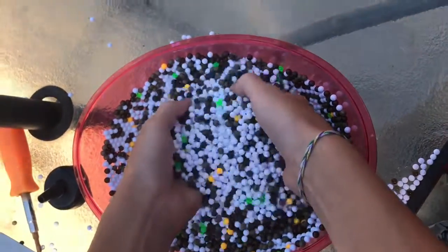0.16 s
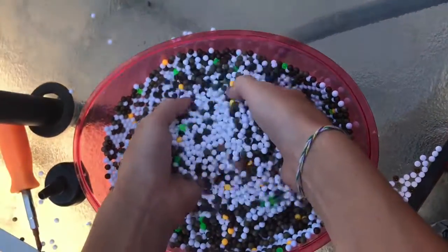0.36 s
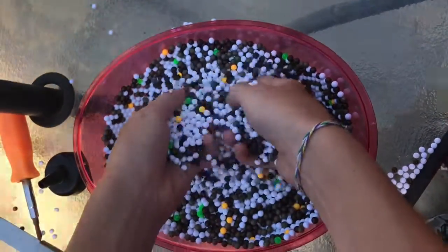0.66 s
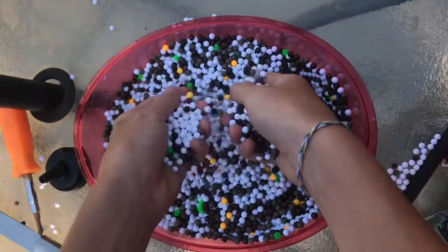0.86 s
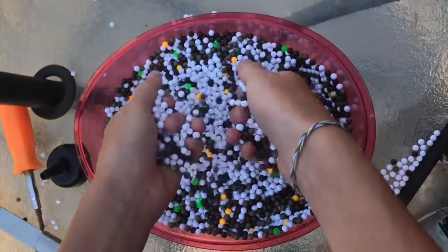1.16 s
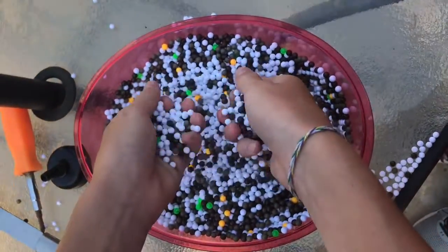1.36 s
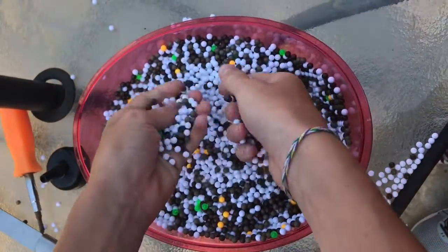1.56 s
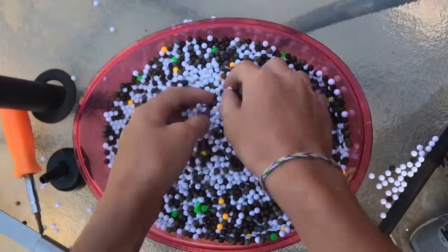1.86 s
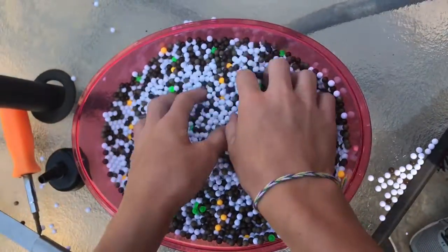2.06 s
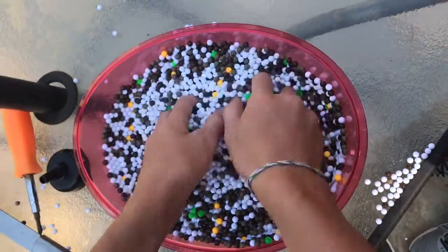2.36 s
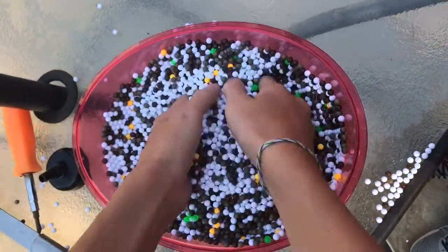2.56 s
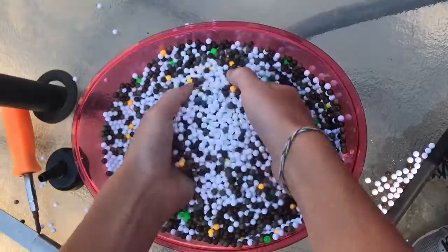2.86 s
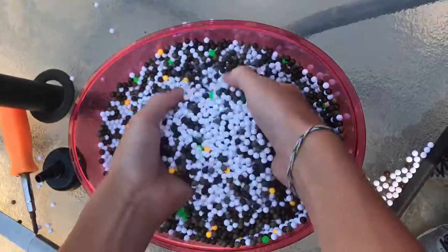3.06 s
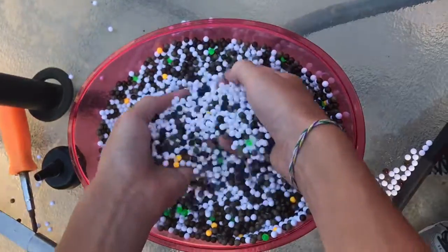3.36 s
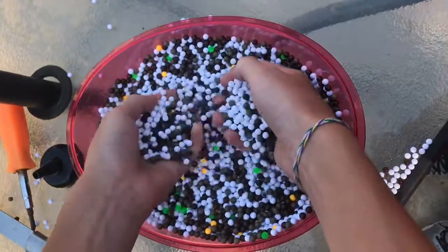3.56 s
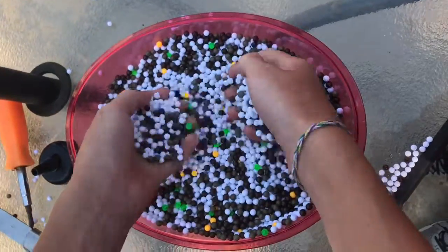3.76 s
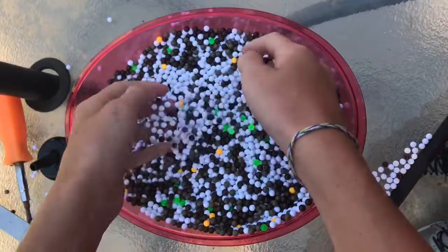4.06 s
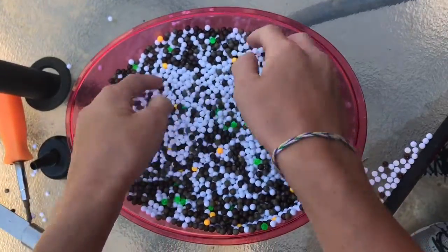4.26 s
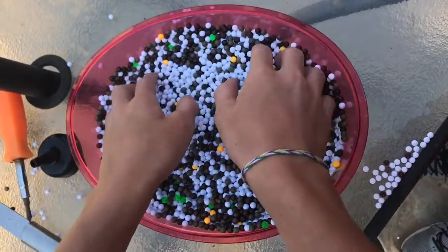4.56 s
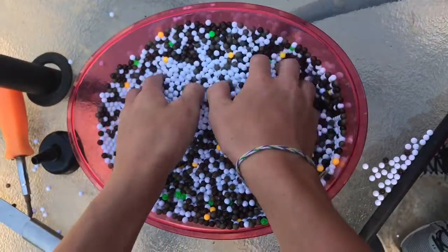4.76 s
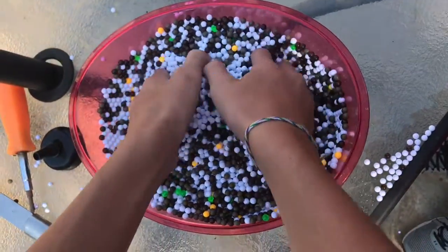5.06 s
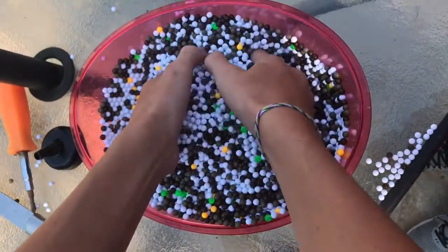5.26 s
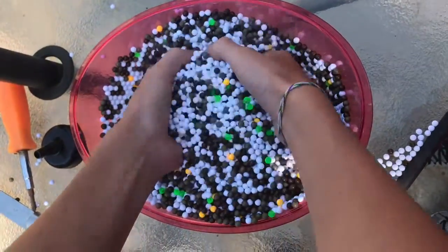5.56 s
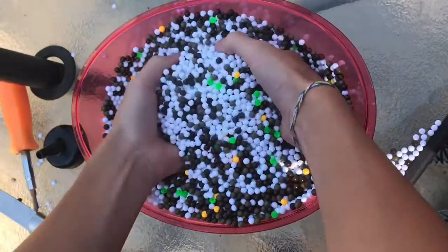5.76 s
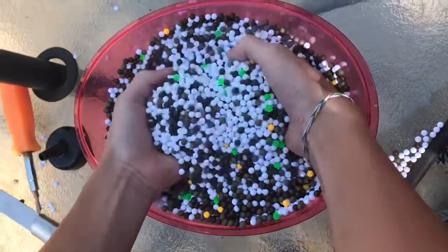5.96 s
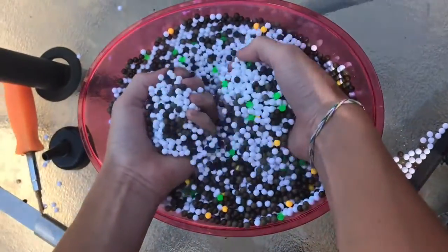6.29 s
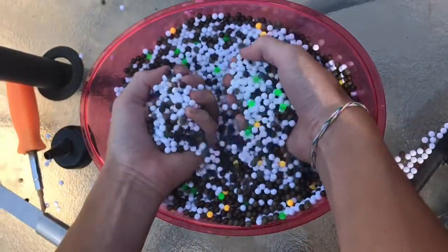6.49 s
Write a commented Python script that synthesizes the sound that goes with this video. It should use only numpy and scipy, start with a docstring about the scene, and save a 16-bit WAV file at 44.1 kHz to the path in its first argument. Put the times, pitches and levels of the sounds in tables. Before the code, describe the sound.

Thousands of light plastic beads rattle and hiss as they are pushed, scooped and let run back in a plastic bowl with a faint hollow tone. The rush opens strong, thins to a few ticking drops, surges again, breaks into hard clacks around the middle, and finishes with its biggest sweep. Wind thumps the close microphone in irregular gusts; the outdoors is otherwise quiet, without echo.

```python
"""Plastic beads scooped in a bowl

Two hands scoop small plastic beads in a wide plastic bowl outdoors and let them run back.
Pushed beads rush as thousands of random noise-burst knocks; falling beads clack, each with its own ring.
Gusts thump the microphone as bands of lumpy noise; a faint outdoor rumble is steady filtered noise."""
import sys
import numpy as np
from scipy import signal
from scipy.fft import rfft, irfft
from scipy.io import wavfile
from scipy.ndimage import uniform_filter1d

SR = 44100
rng = np.random.default_rng(int(sys.argv[2]) if len(sys.argv) > 2 else 0)


def int16_out(signal):
    """Quantize to a 16-bit WAV file."""
    q = np.round(np.clip(np.atleast_2d(signal).T, -1, 1) * 32767)
    wavfile.write(sys.argv[1], SR, q.astype(np.int16))


N = 292383

# pushes through the heap: [t of peak/s, relative level/dB, swell/s per 10 dB, fade/s per 10 dB]
STROKES = [(0.09, -25, 0.18, 0.13), (0.25, -22, 0.34, 0.4246), (2.01, -20.5, 0.1147, 0.26),
           (2.25, -24, .05, .15), (2.34, -25.5, .08, .3), (2.69, -29, 0.17, 0.03),
           (3.14, -24.5, 0.49, 0.61), (4.04, -26.5, 0.03, 0.04), (4.15, -29, 0.02, 0.21),
           (4.32, -27, .17, 0.3), (4.72, -21, 0.12, 0.13), (4.82, -24.5, 0.02, 0.17),
           (5.09, -27, 0.16, 0.26), (5.335, -26.5, .08, .07), (5.6, -23, .38, .12), (5.76, -25, 0.1, 0.05),
           (5.94, -24, 0.02, 0.08), (6.06, -18, 0.25, 0.24), (6.6, -25, 0.58, .5)]
# hands stop to turn, heap settles: [t/s, level change/dB, half length to 1/e/s]
RESTS = [(1.89, -4, 0.021), (2.17, -5.5, .035), (3.829, -4, 0.021), (4.415, -3.5, .03), (4.49, -6.5, 0.034)]
# fingers under the heap: [t/s, depth/0-1]
FINGER_DEPTH = [(0, .7), (.3, 0.18), (1.95, 0), (2.5, 0.35), (2.9, 1.0), (3.25, 0.06), (4.15, 0.2),
                (4.9, 0.49), (5.8, 0.96), (6.15, 0.26), (6.63, 0.17)]
# ring of the hollow between hands and heap: [t/s, f/Hz, relative level/dB]
HAND_HOLLOW = [(0, 2710, 4), (.25, 2730, 10), (1.2, 2700, -36), (2.05, 3204, -5), (2.9, 2490, -5),
               (5.4, 3420, -7), (6.63, 3027, 6)]
# hollow tone of the bowl: [t/s, relative level/dB]
BOWL_LEVEL = [(0.0, -40), (1.77, -44.5), (2.03, -38.5), (2.16, -49), (2.27, -38.5), (2.71, -41.5),
              (2.79, -45.5), (2.88, -42), (4.3, -41.5), (4.49, -52), (4.82, -40), (4.91, -46.5),
              (5.11, -40), (5.6, -39), (5.83, -42.5), (6.02, -33.5), (6.28, -42), (6.63, -40.5)]
# single beads landing hard on the heap: [t/s, relative level/dB, ring f/Hz]
CLACKS = [(0.737, -26.5, 5600), (0.9183, -23.5, 3010), (0.9423, -24, 2970), (0.9957, -27, 6840),
          (1.064, -25.5, 4100), (1.2723, -22, 6700), (1.2795, -25.5, 3570), (1.452, -30, 3190),
          (1.816, -24.5, 8140), (1.855, -24.5, 6840), (2.6942, -19.5, 4600), (2.9018, -27, 2820),
          (2.9152, -23.5, 2520), (3.6547, -23.5, 2730), (3.7563, -26, 2760), (3.8067, -20, 2700),
          (3.8544, -28, 3780), (3.8798, -20, 5170), (3.9144, -23.5, 2880), (3.9779, -17.5, 6600),
          (3.9939, -19, 3080), (4.0479, -17.5, 2830), (4.0948, -20.5, 3360), (4.3753, -21, 4080),
          (4.4265, -22, 6160), (4.443, -24, 2760)]
# breeze on the microphone: [t/s, relative level/dB]
BREEZE = [(0, -43.5), (.27, -57.5), (.45, -46), (.8, -35.5), (1.08, -46.5), (1.5, -28), (1.87, -42.5),
          (2.1, -30.5), (2.32, -42), (2.5, -33.5), (3.4, -46.5), (4.2, -49), (4.65, -47.5), (5.1, -53),
          (5.45, -48.5), (5.75, -35), (6.2, -40.5), (6.63, -54)]
# gusts on top of the breeze: [t of peak/s, relative level/dB, half length to 1/e/s]
GUSTS = [(0.508, -34, 0.021), (.975, -23, 0.024), (1.183, -30, 0.04), (1.34, -29, 0.017),
         (1.455, -21.5, 0.058), (1.555, -22.5, 0.043), (1.703, -19.5, 0.045), (1.821, -32.5, 0.023),
         (1.946, -23.5, 0.02), (2.109, -32, 0.063), (2.21, -30, 0.022), (2.433, -21, 0.041),
         (2.52, -24.5, 0.055), (2.665, -23.5, .025), (2.808, -31.5, 0.052), (3.11, -32, 0.023),
         (3.185, -28, 0.019), (3.65, -33, .03), (3.769, -36, 0.036), (4.044, -40, 0.021),
         (4.251, -35, 0.016), (4.58, -34.5, 0.029), (4.677, -35, 0.022), (4.81, -32.5, 0.02),
         (5.26, -41, .02), (6.136, -20, 0.037)]
# sharp puffs at the microphone port: [t/s, relative peak/dB, centre to zero crossing/s]
PUFFS = [(1.449, -19, 0.00095), (1.466, -10, 0.0011), (1.548, -9.5, 0.00094), (1.557, -22, 0.00093),
         (1.82, -18.5, 0.0024), (2.097, -13.5, 0.0025), (2.15, -12, 0.0019), (2.414, -19, .0015),
         (2.446, -18, .0015), (2.5, -16, 0.00097), (2.549, -18, 0.001), (6.1, -18, 0.00087),
         (6.141, -11, 0.00085)]

# spectra, scaled to unit energy in use: [f/Hz, relative level/dB]
# bead clatter
CLATTER_SPECTRUM = [(1500, -37), (2250, -12), (2680, -2.5), (3600, -3.5), (4250, 0.5), (4850, -3.5),
                    (5400, -2.5), (6800, -1), (7600, -3), (8900, -2), (9800, -4), (10600, -9.5),
                    (15000, -16.5)]
# rubbing beads
RUB_SPECTRUM = [(1100, -34), (1550, 3.5), (1800, 9.5), (2250, 3), (3000, -28.5)]
# bright ticks
TICK_SPECTRUM = [(5000, -18), (9000, 4), (10400, 2), (11300, 4.5), (12800, 3), (14000, 2), (15800, 3)]
# hollow bowl
BOWL_SPECTRUM = [(300, -14), (500, -20.5), (750, -5), (1000, -2.5), (1200, 2.5), (1450, -2), (1900, -12),
                 (2400, -35.5)]
# bead landing
CLACK_SPECTRUM = [(400, -37), (1200, -1.5), (1800, -13), (2700, 2), (4000, -1), (4800, -3), (6700, -2),
                  (7700, -4), (9200, 0.5), (10500, -5.5), (12000, -4), (15800, -1.5)]
# lowest wind band
RUMBLE_SPECTRUM = [(22, -37.5), (42, 9.5), (58, 7.5), (90, 6.5), (125, -2), (170, -11.5), (400, -68)]
# middle wind band
FLUTTER_SPECTRUM = [(70, -41.5), (130, 2), (185, 2.5), (260, -7), (350, -20.5), (800, -83)]
# small, higher eddies
EDDY_SPECTRUM = [(170, -38), (280, 6), (380, -2.5), (490, -11.5), (1100, -61)]
# distant outdoors
OUTDOOR_SPECTRUM = [(20, -23), (55, 16), (250, -2), (12000, -48)]

TRICKLE_DB = -35.7   # beads running off the fingers between strokes
HOLD_S, HOLD_HALF_LENGTH_S, HOLD_DB = 1.55, 0.11, -8   # cupped hands hold beads; trickle dries up
MIDDLING_STIR_DB, MIDDLING_BOWL_DB = -28, -39.5   # reference levels
# base level, dB per dB of stir, dB added at full depth
RUB_BASE_DB, RUB_DB_PER_DB, RUB_DEEP_DB = -43, 0.58, 3.8
TICK_BASE_DB, TICK_DB_PER_DB, TICK_DEEP_DB = -29, 0.63, -6.5
RUB_DB_PER_BOWL_DB = 0.59
TICK_REST_FACTOR = 1.4   # ticks drop more than clatter at rests
MIDDLING_COLLISIONS_PER_S, THINNING_DB_PER_DB = 1450, 1.25   # rate follows the stir
UNEVEN_DB, UNEVEN_DB_PER_DB = 2.5, 0.04   # knock spread at a middling stir; widens as the rush weakens
# light drops while the clatter is below the threshold
STRAYS_PER_S, STRAY_OVER_DB, STRAY_SPREAD_DB, STRAY_BELOW_DB = 36, 4, 1.5, -32
OUTDOORS_DB = -59.5
CUTOFF_HZ = 15850


def stirring():
    """Strength of the rush in dB: powers of strokes and trickle add."""
    t = np.arange(N) / SR
    power = from_db(TRICKLE_DB + HOLD_DB * hump(HOLD_S, HOLD_HALF_LENGTH_S)) ** 2
    for peak_s, db, swell_s, fade_s in STROKES:
        below_peak_db = 10 * np.maximum((peak_s - t) / swell_s, (t - peak_s) / fade_s)
        power = power + from_db(db - below_peak_db) ** 2
    return 10 * np.log10(power)


def settling():
    """Level change in dB while the hands rest."""
    return sum(db * hump(s, half_length_s) for s, db, half_length_s in RESTS)


def stirred_beads(stir_db, rest_db):
    """The same collisions excite clatter, rubbing, bright ticks and the hollow tone of the bowl."""
    (depth,), (bowl_db,) = in_time(FINGER_DEPTH), in_time(BOWL_LEVEL)
    hollow_hz, hollow_db = in_time(HAND_HOLLOW)
    effort_db = stir_db - MIDDLING_STIR_DB
    per_s = MIDDLING_COLLISIONS_PER_S * from_db(THINNING_DB_PER_DB * (effort_db + rest_db))
    uneven_db = np.maximum(UNEVEN_DB - UNEVEN_DB_PER_DB * effort_db, 0)
    knocks = collisions(per_s, uneven_db, clump_db=1.1, clumps_per_s=120,
                        decay_s=0.0012, rise_s=0.00014, ring_db=1.5, ring_width_hz=890)
    knocks = evened(in_bowl(knocks, tail_db=-10, tail_s=0.012), span_s=0.09)

    # countless faint contacts, deep in the heap and on its surface, blur into a hiss
    buried = rms_one(knocks + from_db(-2.0) * rng.standard_normal(N))
    light = rms_one(knocks + from_db(-4.0) * rng.standard_normal(N))

    clatter = coloured(knocks, CLATTER_SPECTRUM)
    hollow_ring = from_db(hollow_db - 5) * moving_resonance(clatter, hollow_hz, width_hz=360)
    clatter = from_db(stir_db + rest_db - 1.01) * (clatter + hollow_ring)

    rub_db = RUB_BASE_DB + RUB_DB_PER_DB * effort_db + RUB_DEEP_DB * depth
    rub_db = rub_db + rest_db + RUB_DB_PER_BOWL_DB * (bowl_db - MIDDLING_BOWL_DB)
    rub = from_db(rub_db) * coloured(knocks, RUB_SPECTRUM)

    tick_db = TICK_BASE_DB + TICK_DB_PER_DB * effort_db + TICK_DEEP_DB * depth
    ticks = from_db(tick_db + TICK_REST_FACTOR * rest_db) * coloured(light, TICK_SPECTRUM)

    bowl = from_db(bowl_db + 1) * coloured(buried, BOWL_SPECTRUM)
    return clatter + rub + ticks + bowl


def collisions(per_s, spread_db, clump_db, clumps_per_s, decay_s, rise_s, ring_db, ring_width_hz, count=48):
    """Beads knock at random, strength drifting in clumps; each knock rings at one of count pitches."""
    born = rng.random(N) < per_s / SR
    scatter_db = spread_db * np.minimum(rng.standard_normal(N), 2)
    sizes = from_db(scatter_db + clump_db * drift(clumps_per_s))
    pitch_index = rng.integers(0, count, N)
    shape = contact(decay_s, rise_s, size=256)
    out = np.zeros(N)
    for k, hz in enumerate(np.geomspace(2400, 14000, count)):
        at = np.flatnonzero(born & (pitch_index == k))
        bursts = sizes[at, None] * shape * rng.standard_normal((len(at), len(shape)))
        places = at[:, None] + np.arange(len(shape))
        knocks = np.bincount(places.ravel(), bursts.ravel(), N)[:N]   # overlap-add
        out += knocks + from_db(ring_db) * resonance(knocks, hz, ring_width_hz)
    return out


def contact(decay_s, rise_s, size=512):
    """One knock spreads through touching beads: envelope of a short burst."""
    t = np.arange(size) / SR
    return (1 - np.exp(-(t / rise_s) ** 2)) * np.exp(-t / decay_s)


def in_bowl(x, tail_db, tail_s):
    """The bowl adds a short diffuse tail: noise following the smoothed energy."""
    r = np.exp(-1 / (tail_s * SR))
    stored = signal.lfilter([1 - r], [1, -r], x * x + 1e-18)
    return x + from_db(tail_db) * np.sqrt(stored) * rng.standard_normal(N)


def falling_beads(drops, decay_s, rise_s, ring_db, ring_width_hz, level_db, lag_s):
    """Each falling bead gives a hard noise tick and a brief ring at its own pitch."""
    out, shape = np.zeros(N + SR), contact(decay_s, rise_s)
    energy = np.sqrt(0.003 * SR)   # unit rms over 3 ms
    for s, db, hz in drops:
        burst = coloured(shape * rng.standard_normal(len(shape)), CLACK_SPECTRUM, size=512)
        burst = burst + from_db(ring_db) * resonance(burst, hz, ring_width_hz)
        at = max(int((s + lag_s) * SR), 0)
        out[at:at + len(burst)] += from_db(db + level_db) * energy * burst / np.linalg.norm(burst)
    return in_bowl(out[:N], tail_db=-22, tail_s=0.017)


def stray_beads(clatter_db, count=400):
    """Random light drops while the rush is weak: rows of t/s, relative level/dB, ring f/Hz."""
    when, chance, pitch = rng.random((count, 3)).T
    local_db = clatter_db[(when * N).astype(int)]
    db = local_db + STRAY_OVER_DB + STRAY_SPREAD_DB * rng.standard_normal(count)
    falls = (chance < STRAYS_PER_S * N / SR / count) & (local_db < STRAY_BELOW_DB)
    return np.column_stack([when * N / SR, db, 2700 * 2 ** (1.5 * pitch)])[falls]


def wind(eddy_db, rumble_growth, flutter_growth, eddy_growth, breeze_share, lumps_db, lumps_per_s):
    """Lumpy turbulence at the microphone port; higher bands grow faster with gust strength."""
    breeze_db, = in_time(BREEZE)
    power = from_db(breeze_db) ** 2
    for s, db, half_length_s in GUSTS:
        power = power + (from_db(db) * hump(s, half_length_s)) ** 2
    gust_db = 10 * np.log10(power) + 28   # above a middling gust
    gust_db = gust_db + lumps_db * np.tanh(drift(lumps_per_s))
    stiff_db = breeze_share * (breeze_db + 37.5)   # from breeze above middling
    rumble, flutter, eddies = (evened(coloured(rng.standard_normal(N), spectrum), span_s=0.052)
                               for spectrum in (RUMBLE_SPECTRUM, FLUTTER_SPECTRUM, EDDY_SPECTRUM))
    return (from_db(rumble_growth * gust_db - 25) * rumble
            + from_db(flutter_growth * gust_db + stiff_db - 34.5) * flutter
            + from_db(eddy_growth * gust_db + eddy_db) * eddies)


def puffs(level_db):
    """A small eddy passes the port: a pressure spike with a dip on either side."""
    t, out = np.arange(N) / SR, np.zeros(N)
    for s, db, width_s in PUFFS:
        near = np.abs(t - s) < 5 * width_s
        u = (t[near] - s) / width_s
        out[near] += from_db(db + level_db) * (1 - u * u) * np.exp(-u * u / 2)
    return out


def distant_outdoors():
    """Faint steady rumble: filtered noise."""
    return from_db(OUTDOORS_DB) * coloured(rng.standard_normal(N), OUTDOOR_SPECTRUM)


def from_db(db):
    """Decibels to gain."""
    return 10 ** (np.asarray(db) / 20)


def rms_one(x):
    """Scale to unit rms."""
    return x / np.sqrt(np.mean(x ** 2) + 1e-20)


def in_time(rows):
    """Each column of a curve at every sample."""
    s, *columns = np.transpose(rows)
    return [np.interp(np.arange(N) / SR, s, c) for c in columns]


def hump(s, half_length_s):
    """Gaussian rise and fall of height one around a moment."""
    return np.exp(-np.minimum(((np.arange(N) / SR - s) / half_length_s) ** 2, 50))


def drift(per_s):
    """Smooth chance of unit rms: random knots, per_s of them a second, joined by lines."""
    knots = rng.standard_normal(N // 20)
    return rms_one(np.interp(np.arange(N) / SR * per_s, np.arange(len(knots)), knots))


def evened(x, span_s):
    """Hold the running rms near one, keeping faster grain."""
    size = max(int(span_s * SR), 64)
    power = uniform_filter1d(uniform_filter1d(x * x, size), size)
    return x / np.sqrt(np.abs(power) + 1e-12)


def coloured(x, spectrum, size=8192):
    """Causal (minimum-phase) filter of unit energy with the given spectrum."""
    hz, db = np.transpose(spectrum)
    grid_hz = np.maximum(np.arange(size // 2 + 1) * SR / size, 1)
    gain = from_db(np.interp(np.log(grid_hz), np.log(hz), db))
    cepstrum = irfft(np.log(gain))
    cepstrum[1:size // 2] *= 2   # fold to minimum phase
    cepstrum[size // 2 + 1:] = 0
    response = irfft(np.exp(rfft(cepstrum)))
    return signal.oaconvolve(x, response / np.linalg.norm(response))[:N]


def resonance(x, hz, width_hz):
    """Two-pole resonance with gain of about one on top."""
    r = np.exp(-np.pi * width_hz / SR)
    poles = [1, -2 * r * np.cos(2 * np.pi * hz / SR), r * r]
    return signal.lfilter([(1 - r * r) / 2, 0, (r * r - 1) / 2], poles, x)


def moving_resonance(x, hz, width_hz):
    """Resonance with a gliding centre: shift to 0 Hz, low-pass, shift back."""
    turn = np.exp(2j * np.pi * np.cumsum(hz) / SR)
    r = np.exp(-np.pi * width_hz / SR)
    return 2 * np.real(turn * signal.lfilter([1 - r], [1, -r], x / turn))


def scene():
    """Beads, wind and the distant outdoors."""
    stir_db, rest_db = stirring(), settling()
    rush = stirred_beads(stir_db, rest_db)
    drops = falling_beads([*CLACKS, *stray_beads(stir_db + rest_db)], decay_s=0.0021, rise_s=0.00045,
                          ring_db=3.5, ring_width_hz=900, level_db=3.0, lag_s=0.0001)
    gusts = wind(eddy_db=-55, rumble_growth=0.91, flutter_growth=1.29, eddy_growth=2.45,
                 breeze_share=0.37, lumps_db=4.5, lumps_per_s=55)
    gusts = gusts + puffs(level_db=2.5)
    gusts = 0.5 * np.tanh(gusts / 0.5)   # hardest buffets are rounded off at the port
    return (rush + drops + gusts + distant_outdoors())[None]


def record(dry):
    """The microphone loses the deepest bass; the top is cut steeply."""
    bass_cut = signal.butter(4, 34, "high", fs=SR, output="sos")
    top_cut = signal.ellip(12, 0.2, 80, CUTOFF_HZ, fs=SR, output="sos")
    return signal.sosfilt(top_cut, signal.sosfilt(bass_cut, dry))


dry = scene()
out = record(dry)
int16_out(out)
```